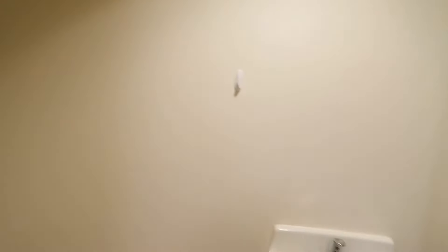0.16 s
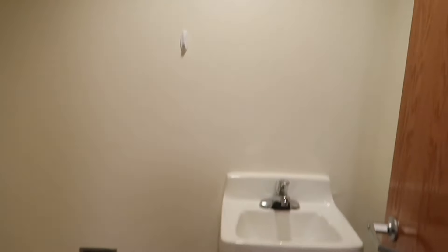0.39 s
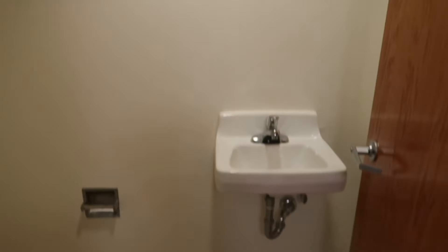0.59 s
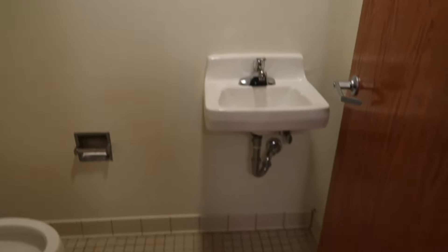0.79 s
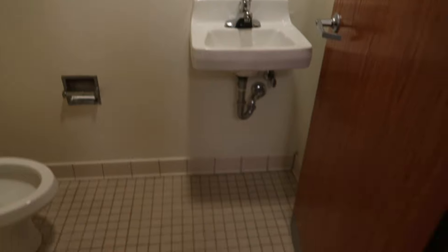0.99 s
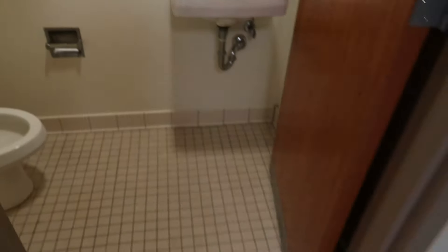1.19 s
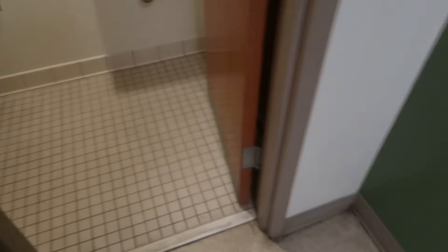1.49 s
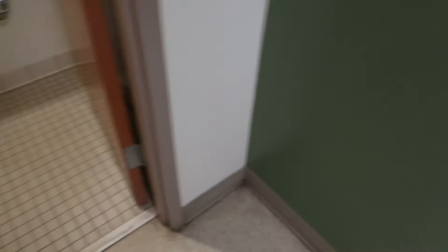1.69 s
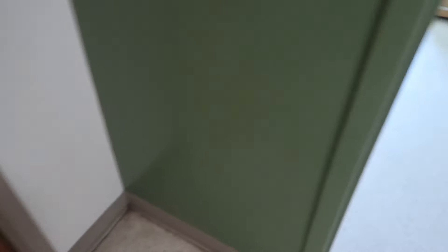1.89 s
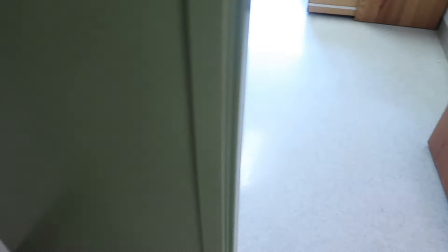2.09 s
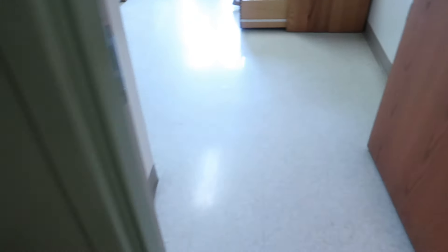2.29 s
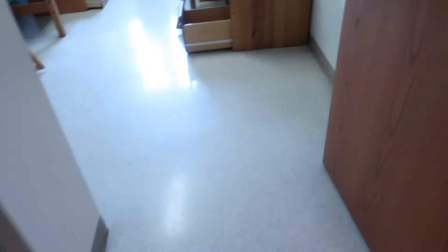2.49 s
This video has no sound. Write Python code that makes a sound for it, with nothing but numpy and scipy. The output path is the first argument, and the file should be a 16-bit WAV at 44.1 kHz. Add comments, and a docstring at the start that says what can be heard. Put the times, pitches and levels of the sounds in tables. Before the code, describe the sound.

Close, loud door thump and metal latch click at the start, a second softer knock, a tiny click, then quiet footsteps and a low drone, all in a reverberant tiled building with steady air hum, heard on a handheld device.

```python
"""Hall of a hard, echoing building: doors are shut, latches clack, leaves thump in their frames.
Blows ring damped modes and, as decaying band noise, the hall; soft steps shuffle near the end.
Ventilation rumble is shaped noise; mains hum and a swelling drone are sines.
The recorder's gain control ducks after the bangs and creeps back."""
import sys
import numpy as np
from scipy import signal
from scipy.fft import rfft, irfft
from scipy.io import wavfile
from scipy.ndimage import uniform_filter1d

SR = 44100
rng = np.random.default_rng(int(sys.argv[2]) if len(sys.argv) > 2 else 0)


def log_audio(samples):
    """Write samples as a 16-bit WAV file to the path given in sys.argv[1]."""
    # one column per channel
    frames = np.atleast_2d(samples).T
    # limit to full scale, then quantise
    limited = np.clip(frames, -1, 1)
    pcm = np.round(limited * 32767).astype(np.int16)
    wavfile.write(sys.argv[1], SR, pcm)


def volts(x):
    """Linear amplitude factor 10**(x/20) for a level x in dB, scalar or array-like."""
    e = np.asarray(x, float) / 20
    return 10 ** e


N = 114660   # samples
BAND_EDGES_HZ = 22 * 2 ** np.arange(0, 9.6, 1 / 3)


def rms_one(x):
    """Scales to unit rms."""
    return x / np.sqrt(np.mean(x ** 2) + 1e-20)


def at_hz(points, hz):
    """Reads a table's second column at hz, linear in log frequency."""
    table_hz, value = np.array(points).T
    return np.interp(np.log(hz), np.log(table_hz + 1e-9), value)


def lag(x, seconds):
    """One-pole smoothing."""
    r = np.exp(-1 / (seconds * SR))
    return signal.lfilter([1 - r], [1, -r], x)


def drift(rate_hz):
    """Slow random wander of unit rms: two-pole smoothed noise at SR / 40, interpolated."""
    r = np.exp(-2 * np.pi * rate_hz * 40 / SR)
    noise = rng.standard_normal(N // 40 + 2002)
    slow = signal.lfilter([1], [1, -2 * r, r * r], noise)[2000:]   # drops the settling
    return np.interp(np.arange(N) / 40, np.arange(len(slow)), rms_one(slow))


def clicks_at(time_s, height):
    """Single-sample clicks on a tiny floor."""
    clicks = np.full(N, 1e-18)
    clicks[(time_s * SR).astype(int)] = height
    return clicks


def dying(time_s, level_db, t60_s):
    """Power that jumps at each moment and decays exponentially."""
    return signal.lfilter([1], [1, -volts(-120 / (t60_s * SR))], clicks_at(time_s, volts(2 * level_db)))


def colour_db(spectrum, hz):
    """Level per Hz, set so that the whole spectrum has unit power."""
    grid_hz = np.arange(20, SR / 2, 10.)
    return at_hz(spectrum, hz) - 10 * np.log10(np.mean(volts(2 * at_hz(spectrum, grid_hz))))


def bands(likeness, uneven_db):
    """Third-octave stereo noise with fine fixed peaks and dips: yields centre and sound."""
    resonance_hz = 24.3
    length = N + SR // 2
    white = rfft(rng.standard_normal((2, 2, length)))
    width = max(int(resonance_hz * length / SR), 1)
    ripple = rng.standard_normal(white.shape[-1])
    ripple = uniform_filter1d(uniform_filter1d(ripple, width), width)
    response = rms_one(volts(uneven_db * rms_one(ripple)))
    white = irfft(white * response, length)
    for k, (low, high) in enumerate(zip(BAND_EDGES_HZ, BAND_EDGES_HZ[1:])):
        sos = signal.butter(2, [low, high], "band", fs=SR, output="sos")
        mid, side = signal.sosfilt(sos, white[k % 2])[:, -N:]   # neighbouring bands differ in source
        hz = np.sqrt(low * high)
        alike = np.clip(at_hz(likeness, hz), -1, 1)
        yield hz, np.sqrt(1 + alike) * mid + np.sqrt(1 - alike) * side * [[1], [-1]]


def struck(blows, modes):
    """Each blow sets every damped mode ringing with a random strength of its own."""
    time_s, blow_db = np.transpose(blows)[:2]
    spread_db = rng.normal(0, 2, (len(time_s), len(modes)))
    out = np.zeros(N)
    for k, (hz, mode_db, t60_s) in enumerate(modes):
        clicks = clicks_at(time_s, volts(blow_db + mode_db + spread_db[:, k]))
        r, w = volts(-60 / (t60_s * SR)), 2 * np.pi * hz / SR
        push = lag(clicks, 0.34 / hz)
        ring = signal.lfilter([0, np.sin(w)], [1, -2 * r * np.cos(w), r * r], push)
        out += lag(ring, 0.24 / hz)
    return out


# latch clacks: (time [s], level [dB], tilt about 1 kHz [dB/octave], crack pitch [Hz], crack level [dB])
CLACKS = [(0.198, -24.5, 5, 2220, -9), (0.211, -21, -7, 1810, -2), (0.815, -31.5, 3.5, 3280, -19.5),
          (0.856, -21.5, 1.25, 1850, -13), (0.867, -23, 0.8, 3470, -13), (0.886, -34, 1.5, 1880, -13),
          (1.251, -32.5, -1, 2820, -23.5), (1.262, -34, -2.6, 1130, -25.5), (1.285, -42.5, -2, 3850, -30.5)]
# door leaf meets frame: (time [s], level [dB], tilt about 1 kHz [dB/octave], knock pitch [Hz],
# knock level [dB])
THUMPS = [(0.204, -27, -5, 65.5, -24), (0.214, -13.5, 2.68, 110, -7.5), (0.228, -9.5, 0.5, 282, -10),
          (0.252, -12.5, -0.5, 523, -19), (0.82, -36, -4.5, 247, -28.5), (0.864, -33, 0.1, 380, -21.5),
          (0.876, -18.5, -2, 58, -12.5)]
# latch modes: (frequency [Hz], level [dB], t60 [s])
LATCH_MODES = [(1300, 4, 0.2), (1780, 20.5, .25), (1936, 15, .15), (2180, -1, .1), (2480, 3, .12),
               (2700, -2, .1), (3050, -21, .2), (3200, -12, 0.53)]
# door leaf modes: (frequency [Hz], level [dB], t60 [s])
LEAF_MODES = [(26.8, -10, 1.1), (58, -13.5, 0.17), (117, 9.5, 0.21), (228, -22, .5), (293, -4, 0.17),
              (314, -8.5, .45), (390, -27, 0.55), (541, -5, 2.1), (601, -20.5, 1.3), (720, -4.5, .7)]


def doors():
    """Latch metal and door leaf ring as damped modes."""
    latch_db, leaf_db = -3, -3
    return volts(latch_db) * struck(CLACKS, LATCH_MODES) + volts(leaf_db) * struck(THUMPS, LEAF_MODES)


# soft footfalls: (time [s], level [dB], tilt about 1 kHz [dB/octave], pat pitch [Hz], pat level [dB])
STEPS = [(1.83, -54, 1, 55.7, -31.5), (1.91, -55, -2, 58, -33), (1.99, -45, -0.5, 278, -47),
         (2.164, -55.5, 3.5, 424, -40.5), (2.288, -44, -0.5, 1130, -40), (2.37, -51, -1, 1190, -40),
         (2.385, -50.5, 1, 406, -34.5)]
# clack spectrum: (frequency [Hz], level [dB per Hz])
CLACK_SPECTRUM = [(150, -27), (300, -8), (700, -8), (1500, -2), (2300, -5), (3300, -5), (4500, -13),
                  (6000, -14.5), (9500, -20), (13000, -16), (14800, -50)]
# thump spectrum: (frequency [Hz], level [dB per Hz])
THUMP_SPECTRUM = [(15, -26), (27, -9.5), (60, -4), (115, -8), (170, -10), (285, -7.5), (413, -16),
                  (600, -12), (1000, -16), (1700, -17), (3400, -24), (11400, -32.5), (14800, -43)]
# footfall and shuffle spectrum: (frequency [Hz], level [dB per Hz])
STEP_SPECTRUM = [(24, -25), (40, -7.5), (180, -11), (400, -20.5), (1100, -16), (3000, -24.5), (9000, -39.5),
                 (14000, -76)]
STEP_T60_SHARE = 0.56   # of the hall's t60


def blow_power(hz, hall_t60_s):
    """Band power of clacks, thumps and steps: quick early drop, hall decay, pitched crack and its tail."""
    early_db, early_t60_s = -3, 0.089
    crack_half_width_octaves, crack_tail_db = 0.28, -13.5
    crack_t60_s = 0.071 + 26 / hz
    power = 0
    for blows, spectrum, t60_share in ((CLACKS, CLACK_SPECTRUM, 1), (THUMPS, THUMP_SPECTRUM, 1),
                                       (STEPS, STEP_SPECTRUM, STEP_T60_SHARE)):
        time_s, level_db, tilt, pitch_hz, crack_db = np.transpose(blows)
        t60_s = t60_share * hall_t60_s
        level_db = level_db + tilt * np.log2(hz / 1000) + colour_db(spectrum, hz)
        off_pitch = np.log2(hz / pitch_hz) / crack_half_width_octaves
        crack_db = crack_db + 10 * np.log10(SR / 2 / pitch_hz) - 3 * off_pitch ** 2
        power = power + dying(time_s, level_db, t60_s)
        power = power + dying(time_s, level_db + early_db, early_t60_s)
        power = power + dying(time_s, crack_db, crack_t60_s)
        power = power + dying(time_s, crack_db + crack_tail_db, t60_s)
    return power


# soles shuffle, a door brushes past: (time [s], level [dB], tilt about 1 kHz [dB/octave])
SHUFFLES = [(1.33, -48, 5), (1.92, -46.5, 1), (2.19, -50.5, 2.5), (2.3, -44, -2.5)]


def shuffle_power(hz, hall_t60_s):
    """Band power of shuffles: smoothed into a slow swell, then decay."""
    rise_s = 0.047
    time_s, level_db, tilt = np.transpose(SHUFFLES)
    level_db = level_db + tilt * np.log2(hz / 1000) + colour_db(STEP_SPECTRUM, hz)
    return lag(dying(time_s, level_db, STEP_T60_SHARE * hall_t60_s), rise_s)


# hall decay: (frequency [Hz], t60 [s])
HALL_T60 = [(25, 1.55), (40, 0.88), (60, 0.59), (130, 0.42), (300, 0.85), (1000, 0.97), (3000, 0.97),
            (7000, 0.88), (14000, 0.13)]
# hall stereo: (frequency [Hz], left-right likeness [-1..1])
HALL_LIKENESS = [(30, .9997), (60, .9993), (125, 1), (300, 1), (600, 1), (1200, 1), (2400, 0.94),
                 (4000, 0.59), (5500, 0.43), (7500, -.33), (10000, -0.4), (14000, -.7)]
# hall balance: (frequency [Hz], left minus right [dB])
BALANCE = [(500, 0), (1000, .8), (2000, 1.4), (4000, .5), (14000, 0)]


def hall():
    """Dense echoes: the power of blows and shuffles shapes noise band by band."""
    rise_s, rise_cycles = 0.0011, 0.5
    out = 0
    for hz, noise in bands(HALL_LIKENESS, uneven_db=2.5):
        t60_s = at_hz(HALL_T60, hz)
        power = blow_power(hz, t60_s) + shuffle_power(hz, t60_s)
        power = lag(lag(power, rise_s), rise_s + rise_cycles / hz)
        lean = volts(at_hz(BALANCE, hz) * np.array([[.5], [-.5]]))
        out = out + np.sqrt(power) * lean * noise
    return out


# ventilation spectrum: (frequency [Hz], level [dB per Hz])
AIR_SPECTRUM = [(15, -32), (28, -2.5), (55, -5.5), (90, -11), (150, -13.5), (300, -14), (450, -22),
                (700, -25.5), (2000, -34.5), (11000, -48.5), (13500, -49), (15500, -83)]
# ventilation stereo: (frequency [Hz], left-right likeness [-1..1])
AIR_LIKENESS = [(60, 1), (180, 0.99), (540, 0.57), (1610, 0.23), (4810, 0.2), (14400, -0.39)]


def ventilation():
    """Steady air noise, each band wandering a little."""
    air_db, waver_db, waver_hz = -40.5, 0.5, 6.4
    out = 0
    for hz, noise in bands(AIR_LIKENESS, uneven_db=1.5):
        out = out + volts(colour_db(AIR_SPECTRUM, hz) + waver_db * drift(waver_hz)) * noise
    return volts(air_db) * out


def tone(hz, rms_db):
    """Sine of random phase at an rms level."""
    t = np.arange(N) / SR
    return np.sqrt(2) * volts(rms_db) * np.sin(2 * np.pi * (hz * t + rng.random()))


# mains hum: (frequency [Hz], level [dB rms])
HUM = [(120, -43), (240, -60)]


def hum():
    """Mains tones, each wavering slowly in level."""
    waver_db, waver_hz = 1.2, 5
    return sum(tone(hz, level_db + waver_db * drift(waver_hz)) for hz, level_db in HUM)


# drone swells and fades: (time [s], level [dB rms])
DRONE = [(1.5, -49), (1.701, -70), (1.76, -41.5), (1.95, -37.5), (2.02, -48), (2.11, -52), (2.16, -42),
         (2.37, -43), (2.44, -66), (2.6, -56)]


def drone():
    """One low sine following a level curve."""
    time_s, level_db = np.transpose(DRONE)
    return tone(180, np.interp(np.arange(N) / SR, time_s, level_db))


def scene():
    """Sum of doors, hall and background."""
    return doors() + hall() + ventilation() + hum() + drone()


def roll_off(x):
    """The treble ends steeply here."""
    return signal.sosfilt(signal.butter(12, 14980, fs=SR, output="sos"), x)


def record(dry):
    """Gain sinks with the held level above a threshold and recovers steadily; peaks are rounded."""
    threshold_db, duck_share, attack_s = -39, 0.38, 0.031
    held_fall_db_per_s, level_lag_s = 19.5, 0.0067
    level_db = 10 * np.log10(lag(np.mean(dry ** 2, axis=0), level_lag_s) + 1e-12)
    climb_db = held_fall_db_per_s * np.arange(N) / SR
    held_db = np.maximum.accumulate(level_db + climb_db) - climb_db   # peak hold, falling steadily
    duck_db = lag(duck_share * np.maximum(held_db - threshold_db, 0), attack_s)
    rounded = 1.44 * np.tanh(dry * volts(-duck_db) / 1.565)
    low_pass = signal.cheby2(10, 60, 15000, fs=SR, output="sos")   # 60 dB down from 15 kHz
    mix = signal.sosfilt(low_pass, rounded)
    return roll_off(mix)


dry = scene()
out = record(dry)
log_audio(out)
```